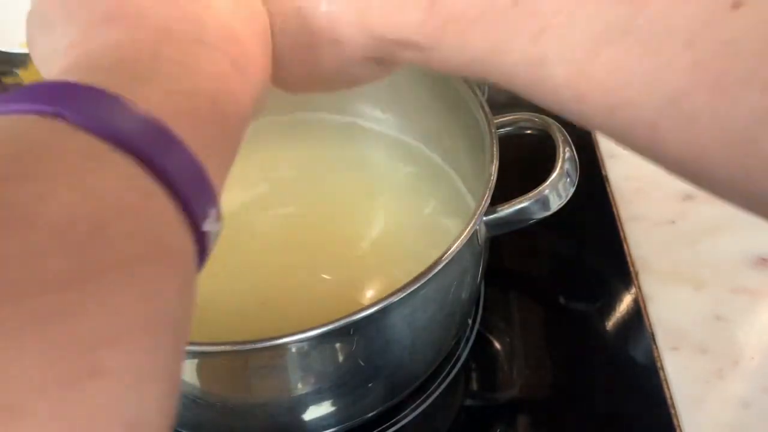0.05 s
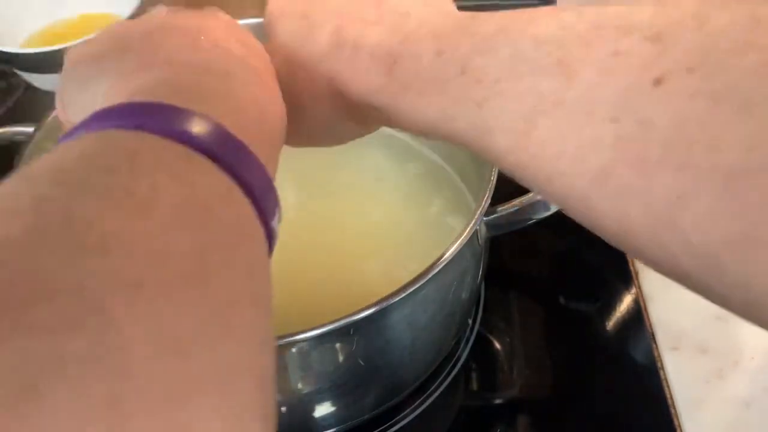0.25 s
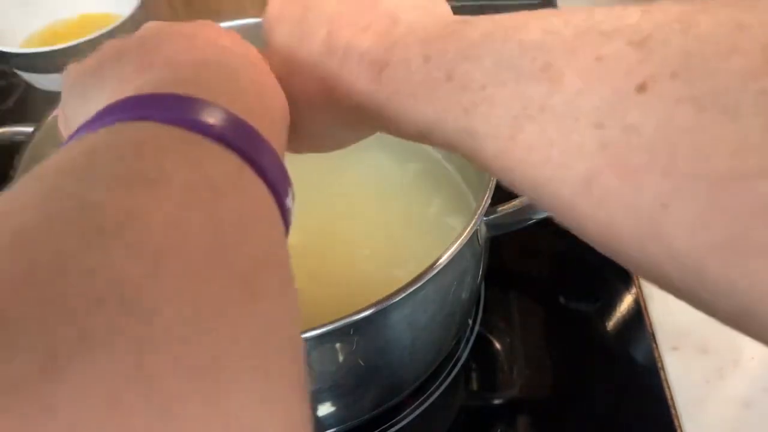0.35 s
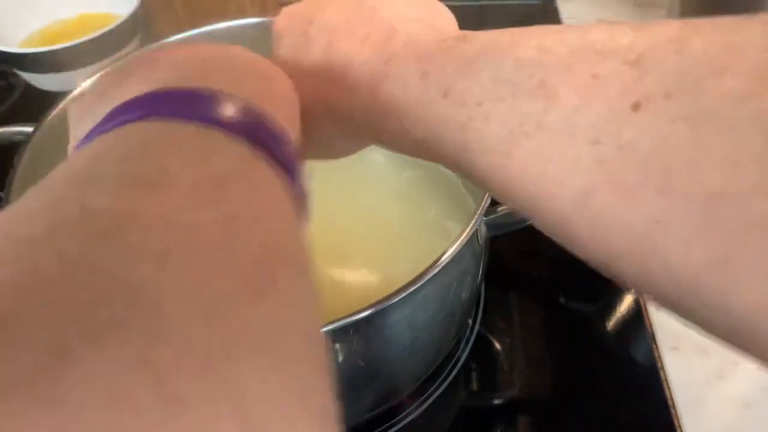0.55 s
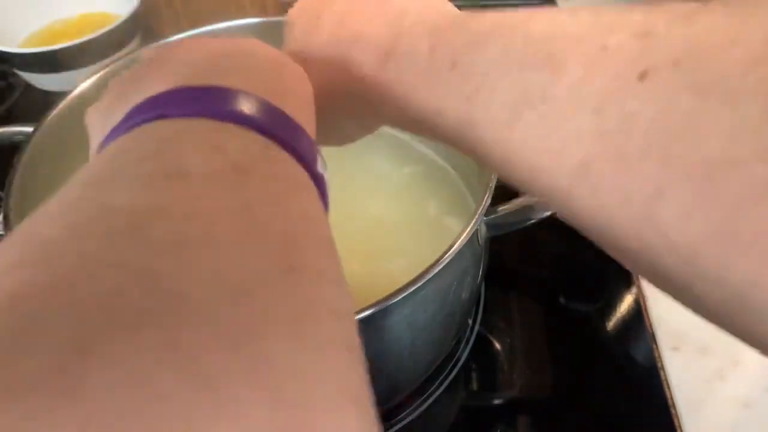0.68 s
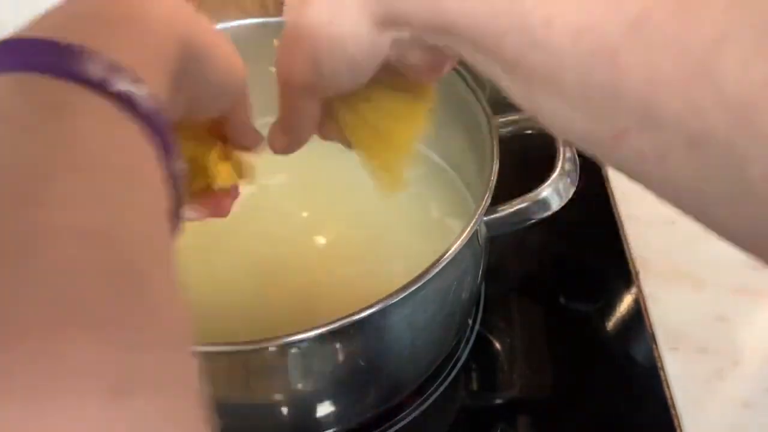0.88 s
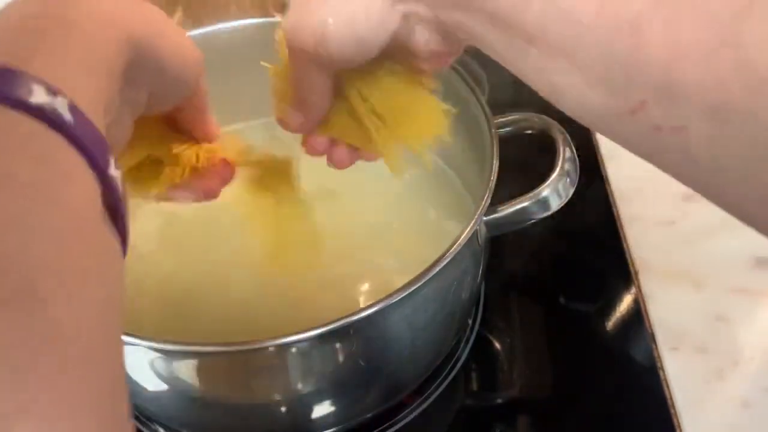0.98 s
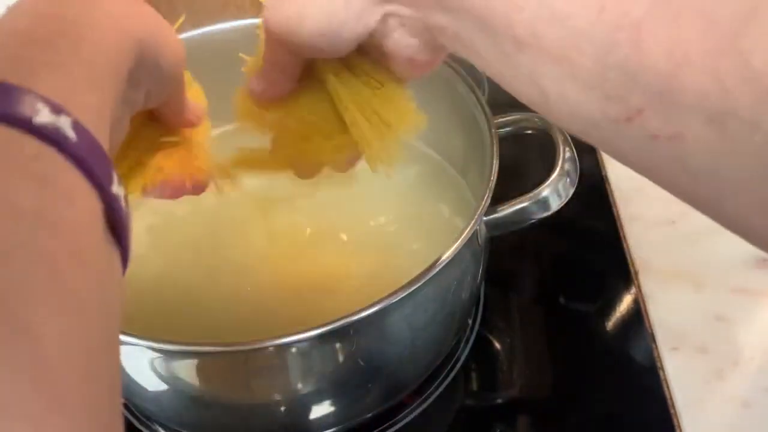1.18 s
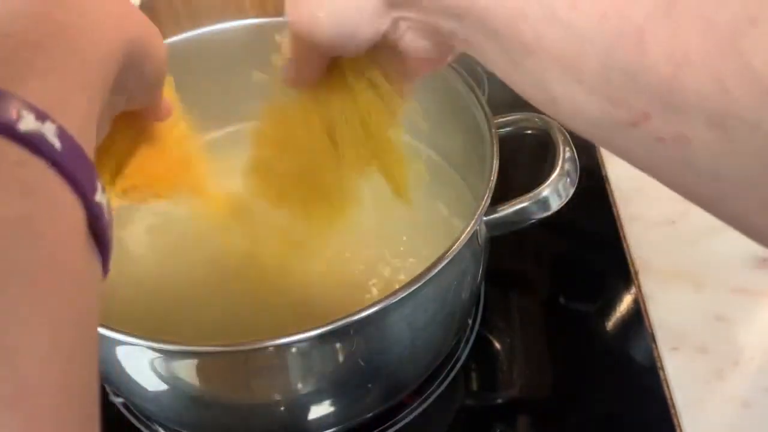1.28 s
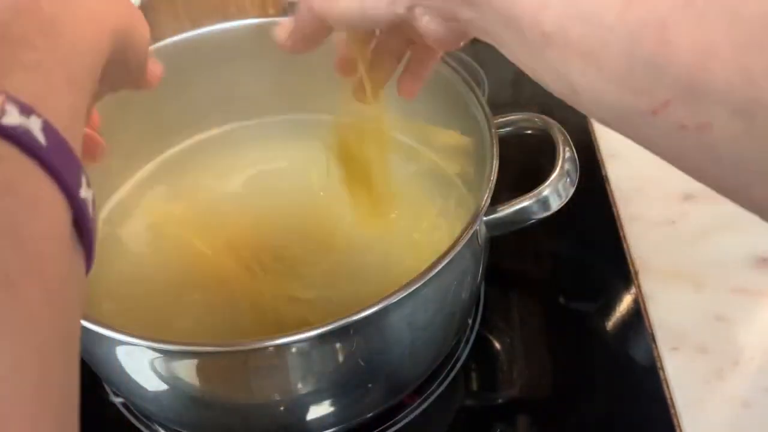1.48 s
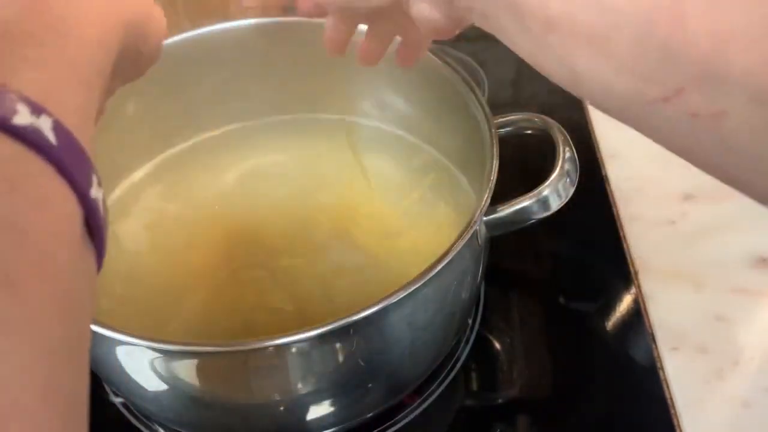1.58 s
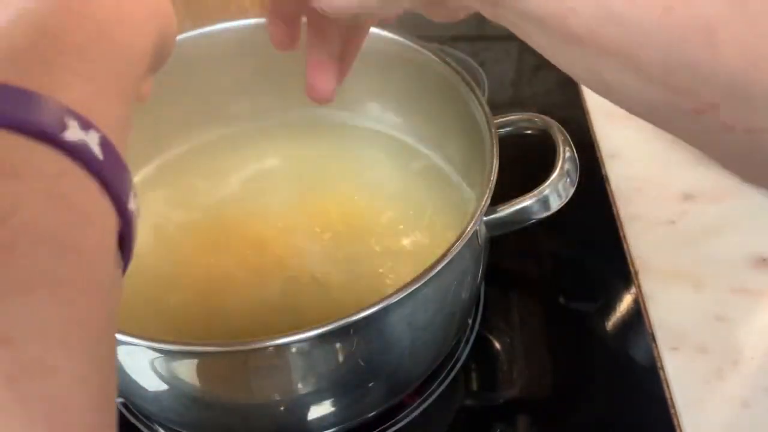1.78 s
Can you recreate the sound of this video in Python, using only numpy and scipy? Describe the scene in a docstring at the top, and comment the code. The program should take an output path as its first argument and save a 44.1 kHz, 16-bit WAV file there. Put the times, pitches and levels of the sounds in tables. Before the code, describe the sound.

A bundle of dry pasta crackles sharply until it breaks, then the strands slide loose and splash lightly into broth. The close stereo microphone also picks up a low stove rumble in the small kitchen.

```python
"""Breaking dry pasta over a pot

A small kitchen, a stereo microphone close to the stove, which rumbles low throughout.
Two hands bend a bundle of dry pasta: strands crack in quick volleys until it gives way with a
soft thump. The pieces then slide out of the fists and patter into the broth, drawing bubbles under."""
import sys
import numpy as np
from scipy import signal
from scipy.fft import rfft, irfft
from scipy.io import wavfile
from scipy.ndimage import uniform_filter1d

SR = 44100
rng = np.random.default_rng(int(sys.argv[2]) if len(sys.argv) > 2 else 0)


def persist_wave(psi):
    """Save psi, clipped to +-1, as 16-bit WAV."""
    counts = np.round(np.clip(psi, -1, 1) * 32767).astype(np.int16)
    wavfile.write(sys.argv[1], SR, np.atleast_2d(counts).T)


N = 81585
T = np.arange(N) / SR
BAND_LIMIT_HZ = 15750
# resonances of the air above the broth: pitch_hz, width_hz, gain_db
POT_RESONANCES = [(993, 83, 4.5), (1840, 120, 9.5), (2660, 140, -4.5)]


def amp(db):
    """Decibels to gain."""
    return 10 ** (np.asarray(db) / 20)


def unit(x):
    """Scales to an rms of 1."""
    return x / np.sqrt(np.mean(x ** 2) + 1e-20)


def read(points, hz):
    """Reads a table along log frequency."""
    table_hz, value = np.transpose(points)
    return np.interp(np.log(hz + 1), np.log(table_hz), value)


def envelope(points):
    """Gain over time from rows of time_s, level_db; silent outside them."""
    time_s, db = np.transpose(points)
    return amp(np.interp(T, time_s, db, left=-np.inf, right=-np.inf))


def add(mix, start_s, sound):
    """Mixes a sound in at a time."""
    part = mix[..., max(round(start_s * SR), 0):][..., :sound.shape[-1]]
    part += sound[..., :part.shape[-1]]


def convolve(x, response):
    """Convolves along time, cut to the length of the scene."""
    return signal.fftconvolve(np.atleast_2d(x), np.atleast_2d(response), axes=1)[:, :N]


def colour(x, points, size=2048):
    """Applies a causal filter of unit energy with the given spectral shape."""
    log_gain = np.log(amp(read(points, abs(np.fft.fftfreq(size, 1 / SR)))))
    taps = np.fft.ifft(np.exp(np.conj(signal.hilbert(log_gain)))).real
    return convolve(x, taps / np.linalg.norm(taps))


def equalise(x, points):
    """Equalises by rows of frequency_hz, gain_db."""
    return irfft(rfft(x) * amp(read(points, np.fft.rfftfreq(N, 1 / SR))), N)


def resonate(x, rings):
    """Adds resonances from rows of pitch_hz, width_hz, gain_db."""
    return x + sum(amp(db) * signal.lfilter(*signal.iirpeak(hz, hz / width, SR), x)
                   for hz, width, db in rings)


def clicks(per_s, spread_db, size=N):
    """Random clicks, mostly small and a few large, with an rms of 1."""
    chance, strength, sign = rng.random((3, size))
    gain = amp(spread_db * np.minimum(-np.log(strength), np.pi))
    return unit((chance < per_s / SR) * np.sign(sign - .5) * gain)


def ticks(per_s, spread_db, count=16, fall_s=0.00098):
    """A crackle of unlike ticks, each smeared by the strands and fingers around it; mid and side."""
    t = T[:SR // 100]
    grains = rng.standard_normal((count, 2, len(t))) * np.exp(-t / fall_s)
    return unit(sum(convolve(clicks(per_s / count, spread_db), unit(grain)) for grain in grains))


def volley(db, fall_s, rise_s=0.00031, size=2048):
    """A few milliseconds of dense clicks, as when one break sets off its neighbours; mid and side."""
    t = T[:size]
    burst = np.array([clicks(per_s=20000, spread_db=2, size=size) for _ in range(2)])
    burst = burst * (1 - np.exp(-t / rise_s)) * np.exp(-t / fall_s)
    return np.pi * amp(db) * burst / np.linalg.norm(burst, axis=1, keepdims=True)


def knock(start_s, db, hz, rise_s):
    """A damped note that swells and dies quickly; hz may glide."""
    t, out = T[:SR // 8], np.zeros(N)
    swell = t / rise_s * np.exp(1 - t / rise_s)
    phase = 2 * np.pi * np.cumsum(hz * np.ones(len(t))) / SR
    add(out, start_s, amp(db) * swell * np.sin(phase))
    return out


def kitchen(mid_side, tail_db=-12, build_s=0.0017):
    """Adds the short tail of the small room and spreads mid and side to left and right."""
    # decay of the room: frequency_hz, t60_s
    decay = [(200, 0.05), (700, 0.11), (1700, 0.26), (4500, 0.37), (9000, 0.33), (15000, 0.24)]
    # stereo width at the microphone: frequency_hz, side_gain_db
    width = [(500, -11.5), (2300, -8.5), (3500, -5.5), (5300, -2), (8000, -2), (9500, -5.5), (11500, -16.5),
             (15000, -6.5)]
    t = T[:SR // 2]
    reflections = rng.standard_normal((2, len(t))) * (1 - np.exp(-(t / build_s) ** 2))
    hz, age, spectra = signal.stft(reflections, SR, nperseg=256)
    spectra = spectra * amp(-60 * age / read(decay, hz)[:, None])
    tail = unit(signal.istft(spectra, SR)[1][:, :len(t)]) / np.sqrt(len(t))
    mid, side = mid_side + amp(tail_db) * convolve(mid_side[0], tail)
    side = equalise(side, width)
    return np.array([mid + side, mid - side])


def stove(level_db=-48, patch_db=2):
    """Uneven low rumble of the stove and the hot pot, centred in the bass and wider above."""
    # spectrum of the rumble: frequency_hz, relative_db
    spectrum = [(15, -41), (25, -7.5), (139, 1), (271, -4), (404, -9), (501, -5.5), (655, -17),
                (952, -13.5), (1760, -22.5), (2240, -23), (2630, -25), (4260, -32.5), (7280, -38.5),
                (8320, -40), (15000, -51)]
    # likeness of left and right: frequency_hz, correlation
    likeness = [(100, 0.99), (300, .75), (600, 0.27), (1100, 0.37), (4000, 0.13)]
    hz = np.fft.rfftfreq(2048, 1 / SR)
    noise = rng.standard_normal((5, N // 512 + 5, len(hz)))
    left, unrelated = noise[0] + 1j * noise[1], noise[2] + 1j * noise[3]
    alike = read(likeness, hz)
    right = alike * left + np.sqrt(1 - alike ** 2) * unrelated
    # the level wavers in small patches of time and frequency
    patches = unit(uniform_filter1d(uniform_filter1d(noise[4], size=5, axis=0), size=6, axis=1))
    spectra = np.array([left, right]) * amp(read(spectrum, hz) + patch_db * patches)
    _, rumble = signal.istft(spectra, nperseg=2048, noverlap=1536, time_axis=1, freq_axis=2)
    return amp(level_db) * unit(rumble[:, :N])


def fan():
    """A faint fan hum: narrow bands of noise in the centre."""
    # bands of the hum: pitch_hz, level_db, width_hz
    bands = [(166.5, -61, 24.5), (272, -61, 18.5), (976, -65, 38)]
    hz, hum = np.fft.rfftfreq(N, 1 / SR), 0
    for pitch_hz, db, width_hz in bands:
        band = rfft(rng.standard_normal(N)) / (1 + (2 * (hz - pitch_hz) / width_hz) ** 2)
        hum = hum + amp(db) * unit(irfft(band, N))
    return hum


def bubbles(count=24, per_s=600, centre_hz=1810, spread_octaves=0.403, fall_cycles=7.5, rise=0.031):
    """Small bubbles drawn under by the pieces ring as short rising notes across the pot."""
    # course of the bubbling: time_s, level_db
    bubbling = [(.98, -77), (1.07, -57.5), (1.15, -57), (1.3, -56.5), (1.42, -45.5), (1.6, -55),
                (1.72, -64)]
    t, notes = T[:SR // 20], 0
    for pitch_offset, pan in rng.standard_normal((count, 2)):
        hz = centre_hz * 2 ** (spread_octaves * pitch_offset)
        age = t * hz / fall_cycles
        note = np.exp(-age) * np.sin(2 * np.pi * hz * t * (1 + rise * age / 2))
        notes = notes + convolve(clicks(per_s / count, spread_db=2), [note, pan * note])
    return envelope(bubbling) * unit(resonate(notes, POT_RESONANCES))


def plop():
    """The first piece to reach the broth sounds one soft note."""
    return knock(start_s=1.052, db=-42, hz=1195, rise_s=0.003)


def sliding():
    """Dry strands tick against each other as they leave the fists."""
    # course of the slide: time_s, level_db
    slide = [(.72, -75), (.82, -58.5), (.88, -53), (.93, -48.5), (1.0, -47), (1.1, -52.5), (1.15, -48.5),
             (1.2, -56.5), (1.26, -46.5), (1.33, -51), (1.36, -42), (1.42, -35.5), (1.5, -41.5),
             (1.62, -49.5), (1.7, -53), (1.78, -78)]
    # colour of rubbing strands: frequency_hz, relative_db
    spectrum = [(300, -14), (1000, -3.5), (2000, -4.5), (3500, 3.5), (6000, -2.5), (9000, 2.5),
                (12500, 5.5), (15500, -5)]
    return colour(envelope(slide) * ticks(per_s=3500, spread_db=1.5), spectrum)


def landing():
    """Pieces hit the broth and each other, singly and in clumps, across the width of the pot."""
    # patter of single pieces: time_s, level_db
    patter = [(1.0, -60), (1.07, -52.5), (1.2, -55), (1.33, -58.5), (1.41, -42), (1.47, -35), (1.54, -36),
              (1.58, -42), (1.63, -41), (1.67, -61.5), (1.78, -70)]
    # clumps landing: start_s, level_db
    clumps = [(1.073, -30.5), (1.116, -35), (1.148, -36.5), (1.355, -27), (1.405, -21), (1.411, -28),
              (1.460, -15.5), (1.465, -18), (1.532, -18.5), (1.596, -26), (1.759, -48)]
    # colour of the splash: frequency_hz, relative_db
    spectrum = [(200, -10), (480, 0.5), (760, -13.5), (1100, -3.5), (1800, -10), (2800, 2), (4400, 0.5),
                (5900, 6.5), (7300, 0.5), (9500, 0), (11000, -2.5), (15500, -9)]
    # extra spread of the splash: frequency_hz, side_gain_db
    width = [(1500, 3.5), (2500, 7.5), (5000, 1.5), (7500, -0.5), (10500, -12), (14000, -5)]
    hits = envelope(patter) * ticks(per_s=3400, spread_db=2)
    for start_s, db in clumps:
        add(hits, start_s, volley(db, fall_s=0.0045))
    mid, side = colour(resonate(hits, POT_RESONANCES), spectrum)
    return np.array([mid, equalise(side, width)])


def thump(start_hz=264, end_hz=80, sag_s=0.00375):
    """The fists jerk apart as the bundle gives: a woody knock, then a sinking low push."""
    sinking_hz = end_hz + (start_hz - end_hz) * np.exp(-T[:SR // 8] / sag_s)
    woody = knock(start_s=0.601, db=-22.5, hz=444, rise_s=0.00099)
    push = knock(start_s=0.604, db=-30.5, hz=sinking_hz, rise_s=0.0076)
    return woody + push


def ringing_pieces(db, count=9, centre_hz=2983, spread_octaves=0.65, t60_s=0.038):
    """Freshly broken lengths ring briefly, each at its own pitch; mid and side."""
    t = T[:2048]
    hz = np.minimum(centre_hz * 2 ** (spread_octaves * rng.standard_normal((count, 1))), BAND_LIMIT_HZ)
    ring = rng.standard_normal((2, count)) @ np.sin(2 * np.pi * hz * t) * amp(-60 * t / t60_s)
    return np.pi * amp(db) * ring / np.linalg.norm(ring, axis=1, keepdims=True)


def breaking(crack_db=-2, ring_db=-7.5, body_lift_db=12.5, body_edge_hz=1900):
    """Volleys and splinters sound through the bent bundle; thicker breaks have more body."""
    # volleys of breaking strands: start_s, relative_db, relative_body_db, fall_s
    cracks = [(0.018, -48.5, -2, 0.0035), (0.099, -40, -20, 0.0036), (0.193, -24, -21, 0.0035),
              (0.2, -10, -25, 0.0047), (0.2041, -11, -20, 0.002), (0.2145, -13, -14, 0.0029),
              (0.2242, -13.5, -9, 0.0042), (0.2267, -11.5, -9.5, 0.0057), (0.2812, -21.5, -12, 0.0025),
              (0.297, -27.5, -7.5, 0.0041), (0.3112, -20, -10, 0.0043), (0.3495, -19.5, -18, 0.0024),
              (0.356, -17.5, -6, 0.0035), (0.364, -9.5, -12.5, 0.0026), (0.3677, -17.5, -8.5, 0.0042),
              (0.381, -14, -10, 0.0035), (0.414, -21, -7, 0.005), (0.421, -20.5, -16, 0.0032),
              (0.433, -19.5, -15, 0.0026), (0.4447, -16.5, -14.5, 0.004), (0.449, -20.5, -17, 0.0026),
              (0.4653, -17, -15, 0.0032), (0.4718, -27, -3, 0.0035), (0.484, -6, -9.5, 0.0029),
              (0.487, -8.5, -11, 0.0038), (0.4972, -10.5, -7.5, 0.0032), (0.52, -12.5, -9.5, 0.0035),
              (0.541, -7.5, -18, 0.0025), (0.5607, -8, -18, 0.0035), (0.5669, -8, -8, 0.0035),
              (0.5805, -8, -6, 0.0024), (0.5896, -15.5, 4, 0.0071), (0.5963, -8.5, -4, 0.0028),
              (0.6004, -1.5, -7.5, 0.0037), (0.6029, -8.5, -9, 0.0038), (0.812, -37.5, -21, 0.0015)]
    # fine splintering under the strain: time_s, level_db
    strain = [(.185, -77), (.2, -31), (.23, -31), (.245, -52), (.31, -51), (.342, -67), (.352, -37),
              (.43, -37), (.5, -31.5), (.555, -35), (.57, -25.5), (.6, -26.5), (.615, -43), (.66, -61),
              (.72, -69)]
    # resonances of the bundle in the cupped hands: pitch_hz, width_hz, gain_db
    bundle = [(990, 103, -2), (1390, 100, 0.5), (2297, 160, 1), (3056, 235, 2), (3820, 250, -4),
              (4170, 224, -0.5)]
    # colour of a breaking strand: frequency_hz, relative_db
    strand = [(100, -25), (450, -12), (760, -20), (1050, -8), (1700, -4), (3000, -3.5), (4400, -0.5),
              (5300, -1), (7200, -0.5), (9500, 3), (12500, -1.5), (15500, -7.5)]
    low_pass = signal.butter(1, body_edge_hz, fs=SR)
    force = envelope(strain) * ticks(per_s=1300, spread_db=2.5)
    for start_s, db, body_db, fall_s in cracks:
        burst = volley(db + crack_db, fall_s) + ringing_pieces(db + crack_db + ring_db)
        body = signal.lfilter(*low_pass, burst)
        treble = burst - body
        add(force, start_s, treble + amp(body_db + body_lift_db) * body)
    return colour(resonate(force, bundle), strand)


def scene():
    """The break and the drop in the kitchen, over the stove and the fan."""
    pasta = breaking() + sliding() + landing() + bubbles()
    return kitchen(pasta) + thump() + plop() + stove() + fan()


def record(dry):
    """The stereo microphone: a treble lift on the left, a low cut, rounded peaks and a band limit."""
    # narrow treble peaks of the left microphone port: frequency_hz, gain_db
    left_port = [(3800, -0.5), (5800, 3), (7000, 2.5), (7880, -10), (8040, 17), (8450, 5.5), (8680, 12),
                 (9000, 3), (10300, -0.5)]
    low_cut_hz, ceiling = 32, 0.75
    channels = np.array([equalise(dry[0], left_port), dry[1]])
    channels = signal.sosfilt(signal.butter(2, low_cut_hz, "high", fs=SR, output="sos"), channels)
    rounded = ceiling * np.tanh(channels / ceiling)
    low_pass = signal.firwin(601, BAND_LIMIT_HZ, window=("kaiser", 9), fs=SR)
    return signal.oaconvolve(rounded, low_pass[None], "same")


dry = scene()
out = record(dry)
persist_wave(out)
```